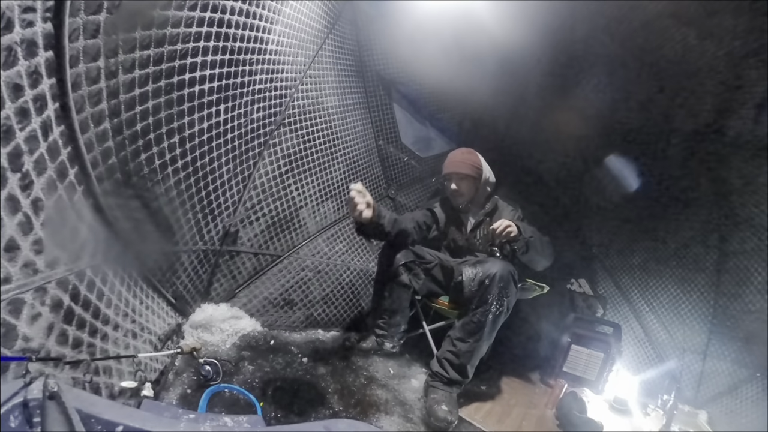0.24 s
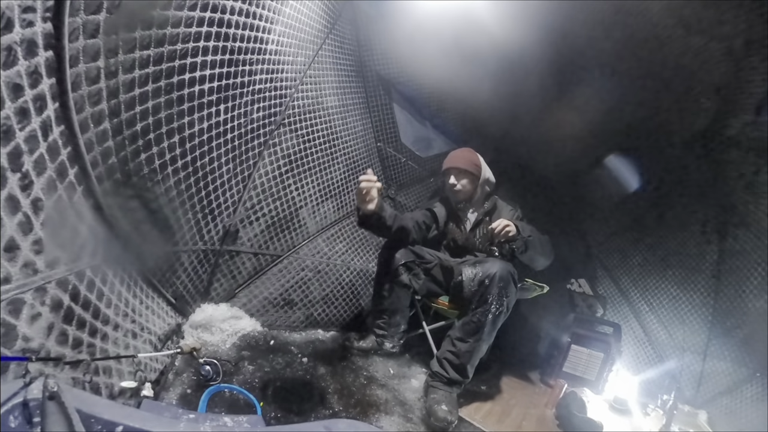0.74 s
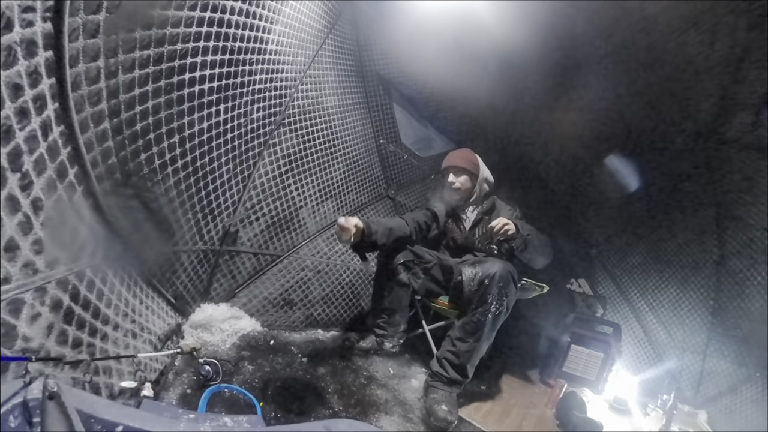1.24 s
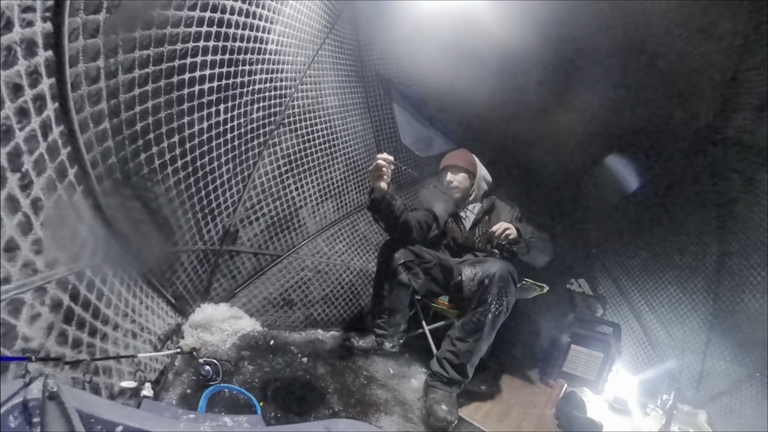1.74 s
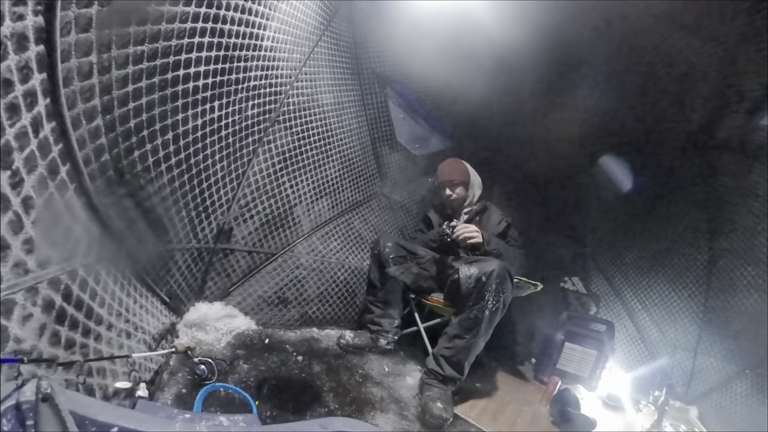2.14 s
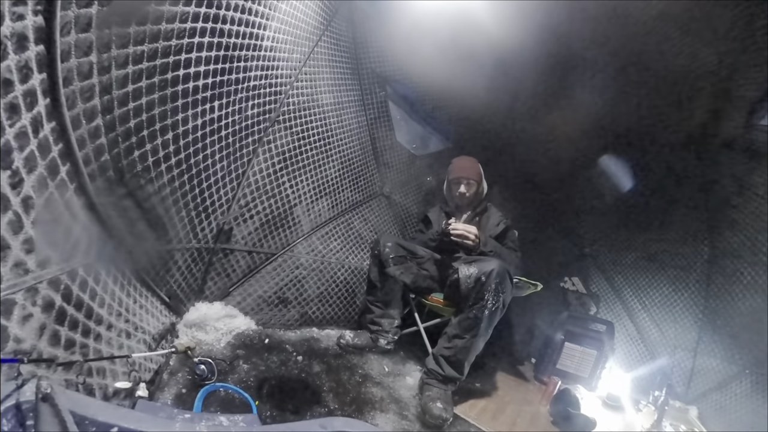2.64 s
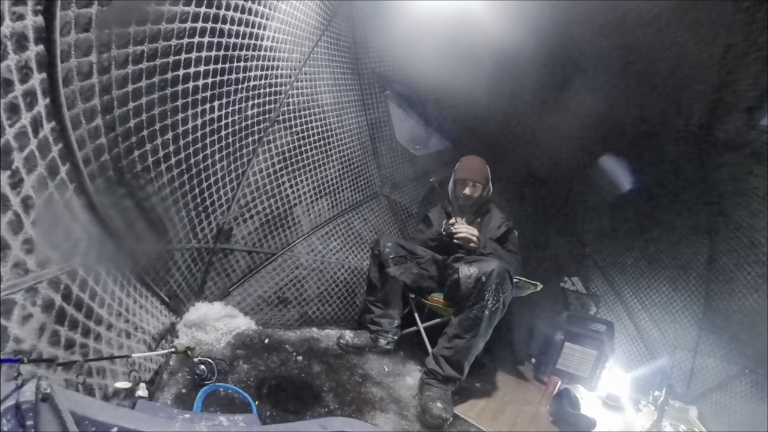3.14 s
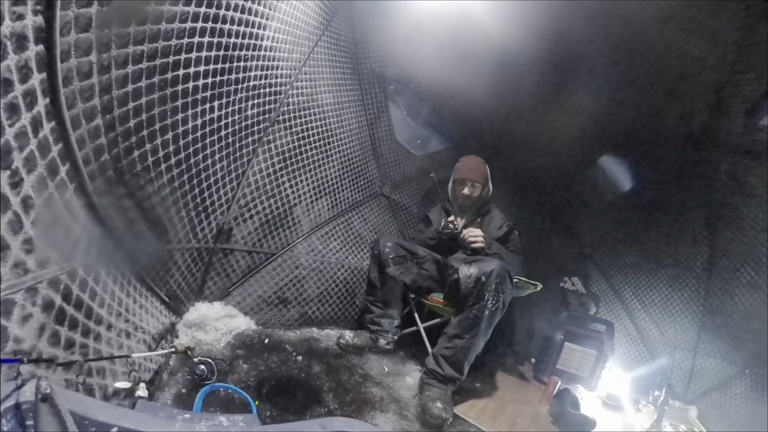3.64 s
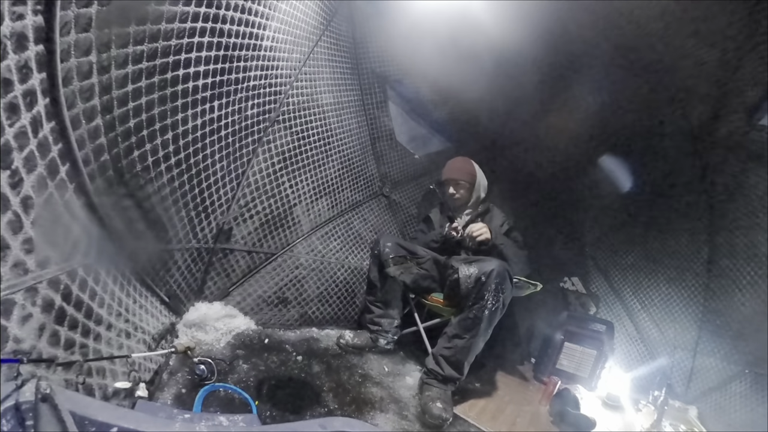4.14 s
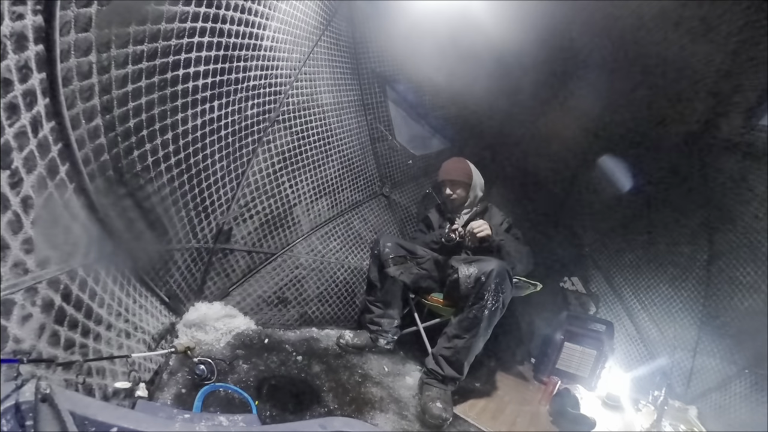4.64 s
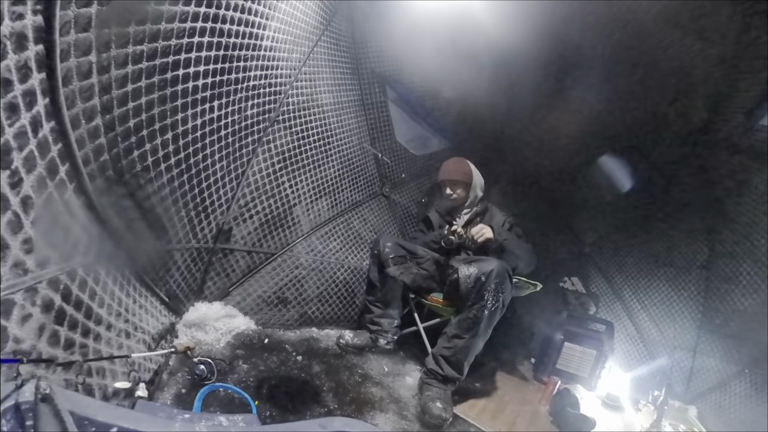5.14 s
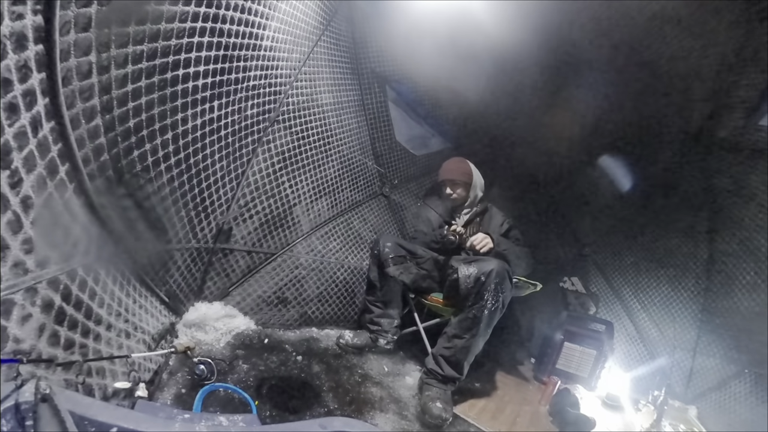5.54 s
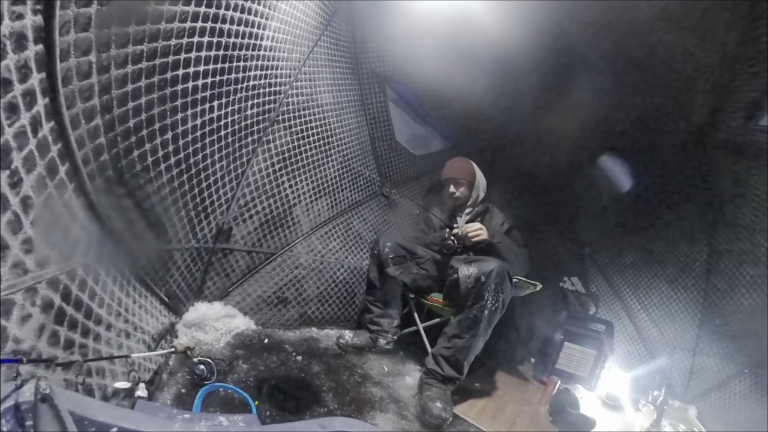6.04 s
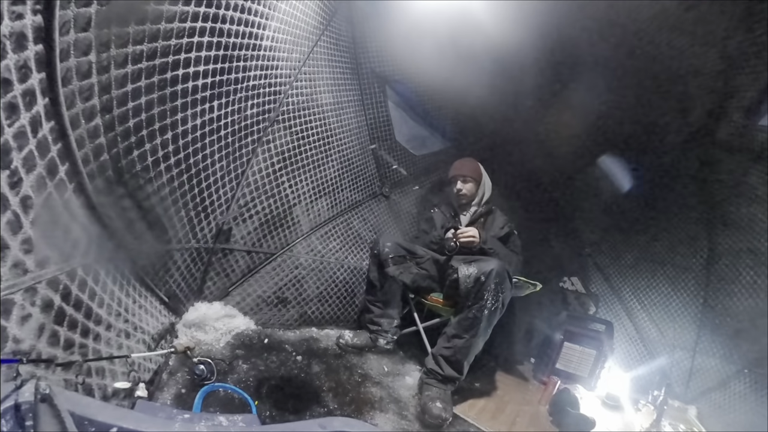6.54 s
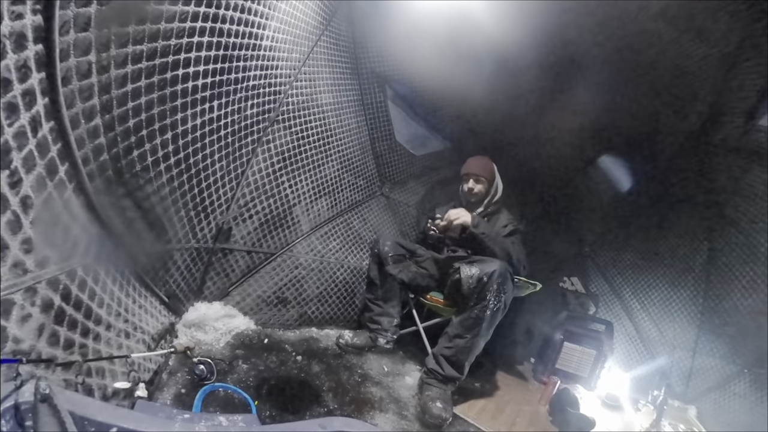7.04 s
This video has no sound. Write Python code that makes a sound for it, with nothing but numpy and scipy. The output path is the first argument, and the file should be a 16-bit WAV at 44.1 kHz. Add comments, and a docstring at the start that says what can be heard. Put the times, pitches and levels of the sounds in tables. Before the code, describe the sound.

A steady fluttering gas flame fills a cramped tent, its low soft roar bumping irregularly under a faint piercing whistle. Light tackle ticks are scattered over it. A hard metallic-plastic click snaps before the middle, with a short dense echo. Afterwards sleeves slide more audibly, with a tiny cloth squeak, and at the very end a rapid movement swells into crackling fabric snaps. Mono, from a fixed microphone in the same small space.

```python
"""Gas heater in an ice tent

Inside a small insulated tent on the ice, a gas heater burns: noise puffs about nine times a second through
burner resonances, with low thumps and a droning housing, and two close sine tones make the jet's thin whistle.
A seated angler's jacket rustles and squeaks as shaped noise; the tackle ticks and gives one sharp click, which
the tent answers. At the end a quick movement swells into a loud, crackling rustle. The sound is mono."""
import sys
import numpy as np
from scipy import signal
from scipy.fft import rfft, irfft, next_fast_len
from scipy.io import wavfile
from scipy.ndimage import map_coordinates

SR = 44100
rng = np.random.default_rng(int(sys.argv[2]) if len(sys.argv) > 2 else 0)


def transcribe(u):
    """Save the signal u as a 16-bit wav file named by the first command-line argument.

    u: samples, shape (n,) or (channels, n), limited to [-1, 1]; the rate is SR.
    q: integer samples, one column per channel.
    """
    v = np.clip(np.atleast_2d(u).T, -1, 1)
    q = np.round(v * 32767).astype(np.int16)
    wavfile.write(sys.argv[1], SR, q)


N = 321577


def amp(db):
    """Logarithmic level: decibels become an amplitude gain."""
    return 10 ** (np.asarray(db) / 20)


def unit(x):
    """Normalisation: scale to an rms of 1."""
    return x / np.sqrt(np.mean(x ** 2) + 1e-20)


def clock():
    """Sampling: the time of every sample in seconds."""
    return np.arange(N) / SR


def along(points, hz):
    """Logarithmic frequency axis: interpolate (frequency, value) points along it."""
    f, v = np.transpose(points)
    return np.interp(np.log(hz + 1), np.log(f + 1), v)


def curve(rows):
    """Linear interpolation: (time, value) rows joined by straight lines."""
    return np.interp(clock(), *np.transpose(rows))


def wobble(rate):
    """Slow random modulation: a smooth curve through `rate` random knots a second."""
    knots = rng.standard_normal(int(N * rate / SR) + 4)
    return map_coordinates(knots, [clock() * rate])


def filtered(x, response):
    """Linear filtering: multiply the spectrum of x by a response of frequency."""
    m = next_fast_len(N + SR // 2)
    hz = np.fft.rfftfreq(m, 1 / SR)
    return irfft(rfft(x, m) * response(hz), m)[..., :N]


def noise(spectrum):
    """Spectral shaping: white noise coloured by a level curve, at an rms of 1."""
    white = rng.standard_normal(N)
    return unit(filtered(white, lambda hz: amp(along(spectrum, hz))))


def body(modes, spectrum, size=8192):
    """Minimum-phase resonator: modes on a broad spectrum give a causal impulse response of energy 1."""
    hz = np.fft.rfftfreq(size, 1 / SR)
    peaks = sum(amp(db) ** 2 / (1 + ((hz - centre) / width) ** 2 * 2) ** 2 for centre, width, db in modes)
    power = peaks + amp(along(spectrum, hz)) ** 2
    # folding the cepstrum onto positive times makes the response causal
    cepstrum = irfft(np.log(power) / 2)
    cepstrum[1:size // 2] *= 2
    cepstrum[size // 2 + 1:] = 0
    response = irfft(np.exp(rfft(cepstrum)))
    return response / np.linalg.norm(response)


def bursts(rows, attack):
    """Exponential decay: (start, level, t60) blows rise fast and die away by 60 dB in t60."""
    envelope = np.zeros(N)
    for start, db, t60 in rows:
        age = np.maximum(clock() - start, 0)
        envelope += amp(db - 60 * age / t60) * (1 - np.exp(-age / attack))
    return envelope


def swells(times, levels_db, rise, fall, roundness=1.65):
    """Amplitude envelope: rounded peaks, with rise and fall to 1/e (s) shared or one per peak."""
    out = np.zeros(N + 2 * SR)  # half a second of margin stands before time zero
    t = np.arange(-SR // 2, SR // 2) / SR
    for s, db, up, down in np.broadcast(times, levels_db, rise, fall):
        peak = amp(db) * np.exp(-np.maximum(-t / up, t / down) ** roundness)
        out[max(round(s * SR), 0):][:len(t)] += peak
    return out[SR // 2:][:N]


# mean level of the gas jet: time_s, level_db
JET_LEVEL = [(0, -71), (1.2, -73.5), (3.5, -69.5), (3.8, -67), (4.6, -66), (4.83, -74.5), (5.1, -66),
             (7.29, -70.5)]
# two close tones of the jet: pitch_hz, relative level_db
JET_TONES = [(11984, -1.5), (12017, 3)]


def jet(drift_hz=2.18, waver_db=2.5):
    """Beating: two close tones of the gas jet interfere while they drift and waver in level."""
    tones = np.zeros(N)
    for pitch_hz, db in JET_TONES:
        phase = 2 * np.pi * np.cumsum(pitch_hz + drift_hz * wobble(6.8)) / SR
        tones += amp(db) * np.sin(phase)
    return amp(curve(JET_LEVEL) + waver_db * wobble(12)) * unit(tones)


# faint singing of the sliding cloth: peak_s, length_s (rise and fall alike), pitch_hz, level_db
CLOTH_SQUEAKS = [(1.222, 0.015, 6150, -65), (2.252, 0.023, 2500, -62.5), (4.327, 0.011, 2600, -52),
                 (4.564, .2, 2550, -64)]
SQUEAK_WIDTH = 0.052  # half width of the band at half amplitude, as a share of the pitch


def squeaks():
    """Friction noise: narrow bands swell and fade as the cloth slides."""
    out = np.zeros(N)
    for s, length, pitch, db in CLOTH_SQUEAKS:
        white = rng.standard_normal(N)
        band = unit(filtered(white, lambda hz: 1 / (1 + ((hz / pitch - 1) / SQUEAK_WIDTH) ** 2)))
        out += swells([s], [db], rise=length, fall=length) * band
    return out


# sleeve strokes, before the common slide gain: peak_s, length_s, level_db
SLEEVE_STROKES = [(0.395, 0.067, -76.5), (1.213, .08, -69), (1.8, 0.51, -77.5), (2.304, 0.2, -72.5),
                  (2.844, 0.32, -70.5), (3.17, 0.05, -72), (3.733, 0.14, -55), (3.97, .17, -60),
                  (4.42, 0.31, -61.5), (5.136, 0.16, -61.5), (5.557, 0.15, -67.5), (5.9, 0.17, -67),
                  (6.193, .12, -60.5)]
STROKE_RISE, STROKE_FALL = 0.75, 0.87  # shares of a stroke's length
REST_DB = -80  # the cloth of a person sitting still, before the slide gain


def sleeves():
    """Sliding friction: each stroke gathers speed and slows, over a faint rest level."""
    s, length, db = np.transpose(SLEEVE_STROKES)
    strokes = swells(s, db, rise=STROKE_RISE * length, fall=STROKE_FALL * length, roundness=1.9)
    return amp(REST_DB) + strokes


# spectrum of sliding cloth: frequency_hz, relative level_db per Hz
CLOTH_SPECTRUM = [(200, -25), (900, 7.5), (1800, 5), (2600, 5), (4000, -0.5), (5600, 3), (8300, -1),
                  (9800, -8), (11500, -20), (15000, -46)]
# mean level of the fast rubbing: time_s, level_db
RUB_LEVEL = [(6.3, -76), (6.45, -61), (6.6, -56), (6.8, -51.5), (7.0, -44), (7.13, -41), (7.2, -40),
             (7.29, -48)]
# spectrum of the fast rubbing: frequency_hz, relative level_db per Hz
RUB_SPECTRUM = [(60, -18), (250, -3), (600, -7), (1500, 2), (2600, -1), (4200, -5), (6000, -5),
                (8500, -9.5), (10000, -16.5), (12000, -29), (15500, -40)]
# folds of cloth snapping: start_s, level_db, t60_s
FOLD_SNAPS = [(7.206, -28, 0.029), (7.222, -34, 0.42), (7.242, -25, 0.052), (7.256, -30.5, 0.12),
              (7.2708, -18.5, 0.019), (7.278, -20.5, 0.047)]
# spectrum of a snapping fold: frequency_hz, relative level_db per Hz
FOLD_SPECTRUM = [(40, -17), (180, -9.5), (370, 4), (600, -4.5), (1100, 1.5), (2500, 0), (4000, -3.5),
                 (4700, -14.5), (8000, -17), (11000, -34), (15500, -55)]


def jacket(slide_db=3.0, grain_db=1.06):
    """Friction and impulsive release: cloth slides softly, then rubs ever louder until folds snap."""
    grain = amp(slide_db + grain_db * wobble(120))
    slide = sleeves() * grain * noise(CLOTH_SPECTRUM)
    rub = amp(curve(RUB_LEVEL) + 0.57 * wobble(150)) * noise(RUB_SPECTRUM)
    snaps = bursts(FOLD_SNAPS, attack=0.0005) * noise(FOLD_SPECTRUM)
    return slide + rub + snaps


# decay of the tent's answer: frequency_hz, t60_s
TENT_DECAY = [(300, 0.12), (1400, 0.17), (2600, 0.18), (3600, 0.14), (6000, 0.098), (12000, 0.13)]


def tent():
    """Reverberation: the tent walls answer with short, dense noise, each band decaying at its own rate."""
    hz, t, z = signal.stft(rng.standard_normal(SR // 2), SR, nperseg=128)
    decay = amp(-60 * t / along(TENT_DECAY, hz)[:, None])
    tail = signal.istft(z * decay, SR, nperseg=128)[1]
    return tail / np.linalg.norm(tail)  # energy 1


# light ticks of the tackle: start_s, level_db, t60_s
TACKLE_TICKS = [(1.352, -61, 0.16), (1.7226, -60.5, 0.13), (1.9007, -45.5, 0.22), (1.966, -58, 0.14),
                (2.2758, -67, 0.1), (2.6051, -62, .12), (3.136, -62, 0.5), (4.8485, -60.5, .12),
                (4.9602, -56.5, 0.25), (5.586, -58, 0.073), (6.0014, -57, 0.09), (6.3341, -53, 0.24)]
# spectrum of a tick: frequency_hz, relative level_db per Hz
TICK_SPECTRUM = [(300, -25), (1200, -7), (2000, 11.5), (3400, 4), (5000, 4), (8000, 0.5), (10000, -9.5),
                 (15000, -39)]
# the catch slips, then strikes: start_s, level_db, t60_s
CATCH_BLOWS = [(2.9272, -34, 0.03), (2.929, -18, 0.031)]
# resonances of the clicking part: centre_hz, width_hz, relative level_db
CATCH_MODES = [(1400, 130, -7.5), (1790, 200, -20), (2120, 120, -6), (2485, 260, 5), (5260, 120, 0.5),
               (5640, 280, 2), (5980, 140, -1), (8260, 900, -15), (9500, 86, -11)]
# broad spectrum under those resonances: frequency_hz, relative level_db per Hz
CATCH_SPECTRUM = [(300, -38), (1000, -21), (1500, -8.5), (3500, -17.5), (6500, -10), (9500, -15.5),
                  (10500, -24), (12500, -35), (15500, -36)]


def tackle(echo_db=1):
    """Impact excitation: light ticks, and one hard catch that rings its modes and the tent."""
    ticks = bursts(TACKLE_TICKS, attack=0.00033) * noise(TICK_SPECTRUM)
    blow = bursts(CATCH_BLOWS, attack=0.00046) * rng.standard_normal(N)
    click = signal.fftconvolve(blow, body(CATCH_MODES, CATCH_SPECTRUM))[:N]
    delayed_tent = np.pad(tent(), (round(0.0076 * SR), 0))  # 7.6 ms before the walls answer
    echo = signal.fftconvolve(click, delayed_tent)[:N]
    return ticks + click + amp(echo_db) * echo


# how fast the flame flutters: time_s, rate in puffs per s
FLUTTER_RATE = [(0.0, 8.1), (0.68, 9.63), (0.81, 11.2), (1.04, 8.42), (2.02, 10.57), (2.14, 8.32),
                (2.33, 11.3), (2.56, 8.16), (2.79, 9.34), (3.67, 9.75), (4.29, 8.47), (4.5, 11.17),
                (4.65, 7.91), (5.02, 9.83), (5.65, 9.89), (6.57, 7.64), (6.7, 9.27), (7.29, 8.79)]
# strength of the flutter, with short lulls: time_s, relative level_db
FLUTTER_VIGOUR = [(0, -2), (0.4, 0.5), (0.75, -3), (1.2, -1), (2.3, -0.5), (3.25, -2.5), (3.8, 1), (4.3, 2),
                  (4.55, 0), (5.2, 2), (5.5, -3.5), (5.75, -2), (6.0, 0.5), (7.29, 2.5)]
# hard flares, before the common gains in flame(): peak_s, roar_db, thump_db
HARD_FLARES = [(0.183, -44, -65), (0.606, -49.5, -48), (0.917, -47.5, -52), (1.035, -46, -48),
               (1.372, -44.5, -55), (1.475, -51, -45.5), (1.779, -49, -47.5), (1.97, -46, -61),
               (2.612, -46.5, -39.5), (2.735, -46.5, -45), (2.922, -45.5, -59), (3.039, -45, -53.5),
               (3.979, -45, -57), (4.083, -49, -47), (4.209, -47.5, -42.5), (4.996, -47.5, -50),
               (5.069, -46, -47), (5.285, -46, -59), (5.993, -48, -50), (6.702, -49, -49.5),
               (6.928, -43, -45)]
# an ordinary puff before those gains and its vigour: mean and scatter of the roar, then of the thump
ROAR_DB, ROAR_SCATTER_DB = -49.5, 1.26
PUSH_DB, PUSH_SCATTER_DB = -58, 2
PUSH_GROWS = 1.3  # thump dB per dB of vigour
LENGTH_SCATTER = 0.15  # spread of puff length (log ratio)


def puffs():
    """Flame flicker: one puff per cycle (s, roar dB, thump dB, relative length); a flare replaces the nearest."""
    cycles = np.cumsum(curve(FLUTTER_RATE)) / SR
    s = np.interp(np.arange(.5, cycles[-1]), cycles, clock())
    vigour_db = np.interp(s, *np.transpose(FLUTTER_VIGOUR))
    roar, push, length = rng.standard_normal(size=(len(s), 3)).T
    roar_db = ROAR_DB + vigour_db + ROAR_SCATTER_DB * roar
    push_db = PUSH_DB + PUSH_GROWS * vigour_db + PUSH_SCATTER_DB * push
    rows = np.column_stack([s, roar_db, push_db])
    for flare in HARD_FLARES:
        rows[np.argmin(abs(s - flare[0]))] = flare
    return *rows.T, np.exp(LENGTH_SCATTER * length)


# burner and housing resonances: centre_hz, width_hz, relative level_db
BURNER_MODES = [(171, 58, -3.5), (224.4, 52, 0), (309.3, 35.4, -2.5), (416, 44, -10), (585.2, 69, -4.5),
                (692.2, 28.4, -2), (908, 70, -16.5), (1069.6, 51, -5.5), (1223, 21, -9.5), (1342, 72, -7.5),
                (1501, 67, -11)]
# broad flame noise: frequency_hz, relative level_db per Hz
FLAME_SPECTRUM = [(30, -34), (150, -29.5), (800, -18), (1500, -31), (1900, -22), (2500, -26.5),
                  (3500, -36.5), (6000, -46), (10000, -49), (16000, -86)]
# droning resonances of the housing: centre_hz, width_hz, relative level_db
HOUSING_MODES = [(220, 66, -1), (304.6, 25, -2), (583, 120, -13)]
# broad spectrum of the drone: frequency_hz, relative level_db per Hz
DRONE_SPECTRUM = [(30, -15), (300, -28), (2000, -64), (8000, -92)]
# spectrum of the low thump: frequency_hz, relative level_db per Hz
THUMP_SPECTRUM = [(15, -18), (35, 0.5), (65, 3), (120, -7), (220, 1), (400, -20), (900, -50), (3000, -88)]


def flame(puff_db=2.5, thump_db=2.5, steady_db=-66, drone_db=-60, lead=0.0025, lump_db=2.5,
          forerun=0.054, forerun_db=-10):
    """Combustion noise: puffs of turbulence excite the burner and push out low thumps as the housing drones."""
    s, roar_db, push_db, length = puffs()
    flare = swells(s - lead, roar_db + puff_db, rise=0.016 * length, fall=0.028 * length)
    # a weak lick ahead of each puff
    lick_db = roar_db + forerun_db + 3 * rng.standard_normal(len(s))
    kindling = swells(s - forerun, lick_db, rise=0.0071, fall=0.033)
    lumps = unit(amp(lump_db * wobble(170)))  # the gas burns in uneven pockets
    strength = np.hypot(flare + kindling, amp(steady_db))
    turbulence = lumps * strength * rng.standard_normal(N)
    roar = signal.fftconvolve(turbulence, body(BURNER_MODES, FLAME_SPECTRUM))[:N]
    pushes = swells(s, push_db + thump_db, rise=.011, fall=0.012)
    thump = (pushes + amp(-71.5)) * noise(THUMP_SPECTRUM)  # over a steady low rumble
    drone = signal.fftconvolve(rng.standard_normal(N), body(HOUSING_MODES, DRONE_SPECTRUM))[:N]
    return roar + thump + amp(drone_db) * drone


def scene():
    """Superposition: heater, jacket and tackle add, alike in both channels."""
    mono = jet() + squeaks() + jacket() + tackle() + flame()
    return np.array([mono, mono])


TOP_HZ = 15750  # band limit


def record(dry):
    """Gain and band limiting: the level dips briefly once, and nothing is kept above the limit."""
    dip = amp(-21 * np.exp(-((clock() - 2.013) / .016) ** 2))  # 21 dB deep
    return filtered(dry * dip, lambda hz: hz < TOP_HZ)


dry = scene()
out = record(dry)
transcribe(out)
```